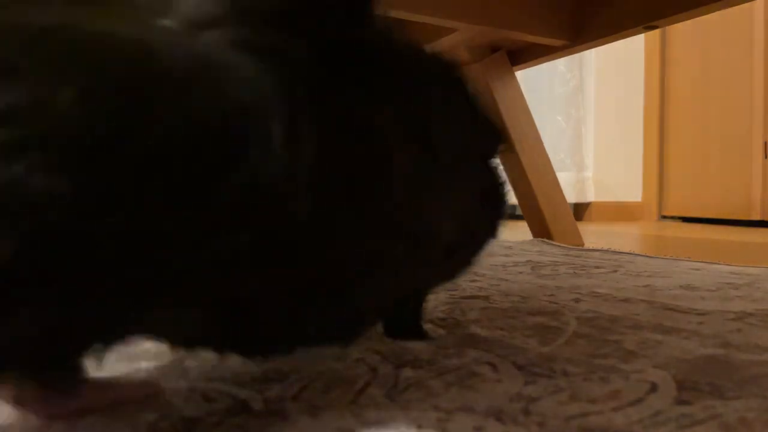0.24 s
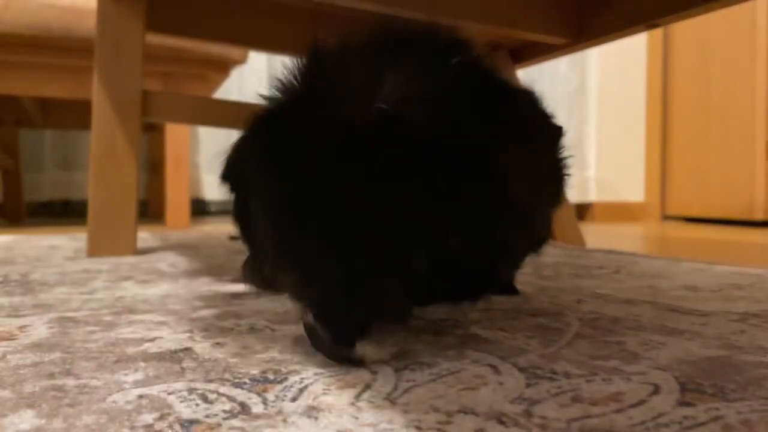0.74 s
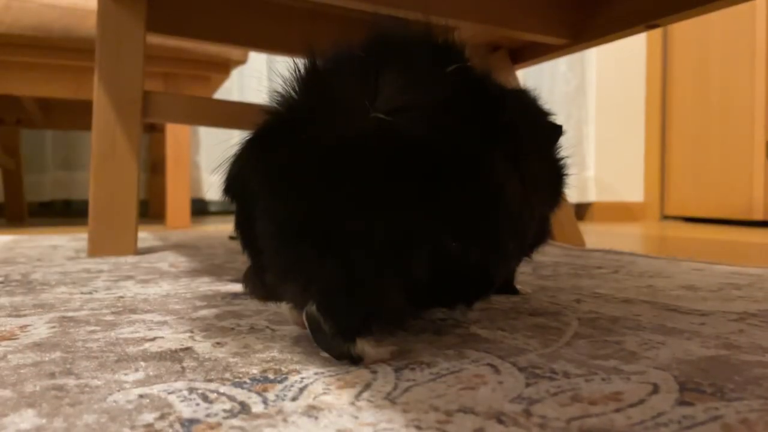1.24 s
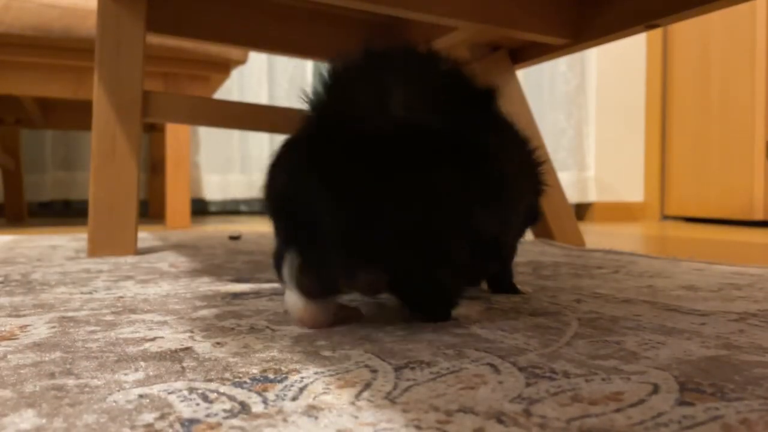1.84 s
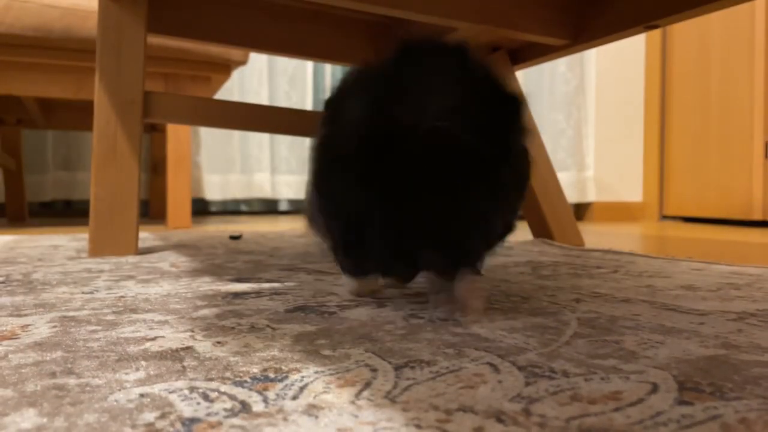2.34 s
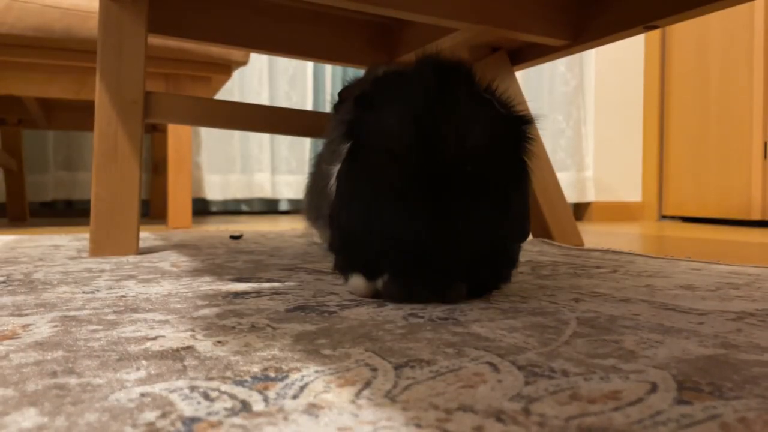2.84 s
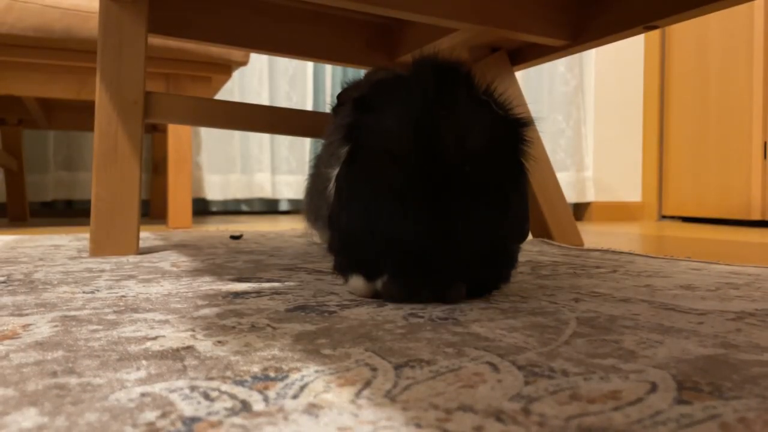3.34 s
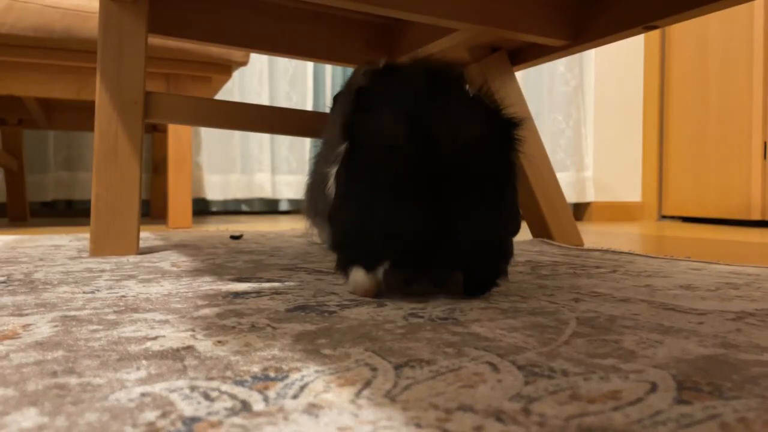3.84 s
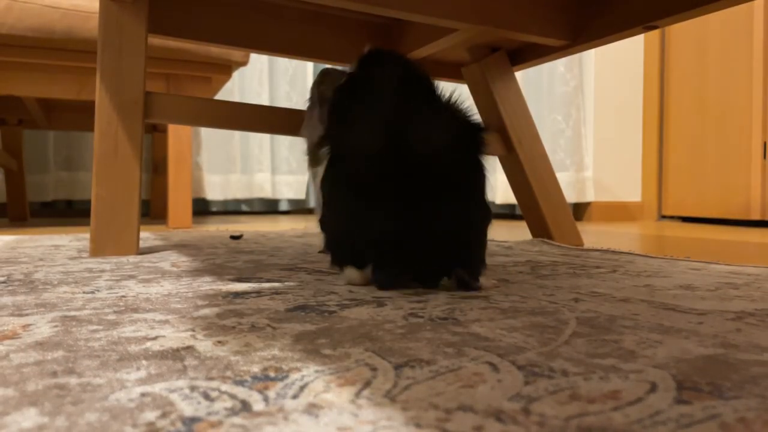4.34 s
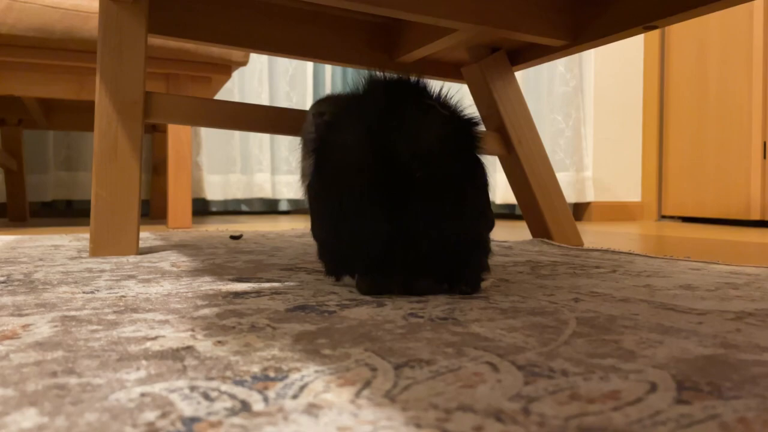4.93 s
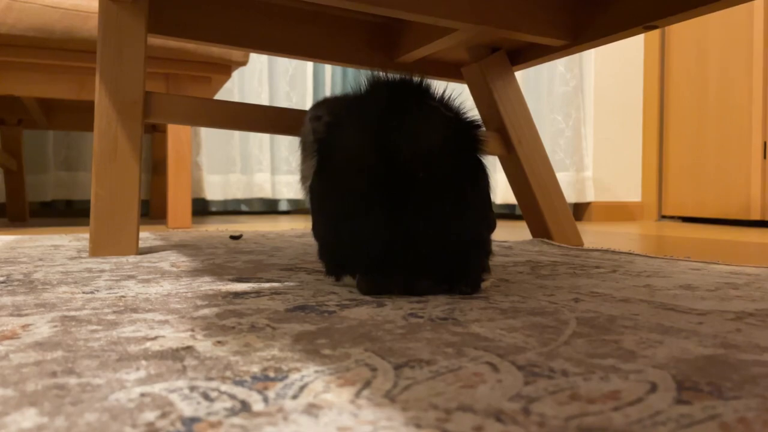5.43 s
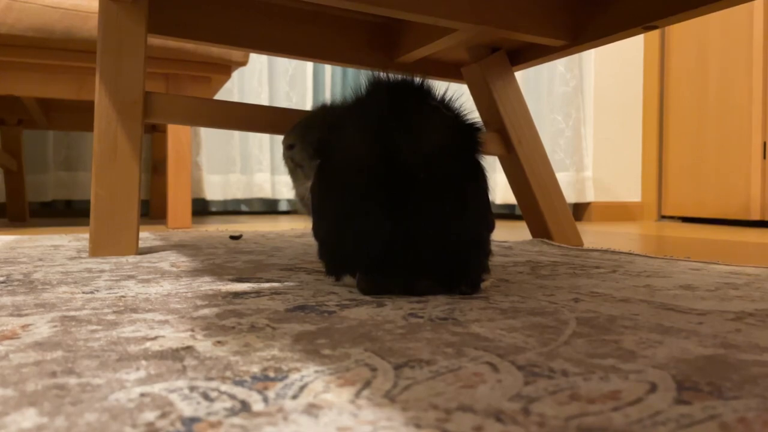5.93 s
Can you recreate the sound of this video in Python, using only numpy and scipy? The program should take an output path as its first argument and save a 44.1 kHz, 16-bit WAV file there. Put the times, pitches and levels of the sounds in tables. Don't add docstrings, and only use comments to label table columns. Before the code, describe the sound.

A guinea pig close by chutters in soft creaky chirps and rattling purrs, with faint rug scuffs and a few low floor thumps indoors.

```python
import sys
import numpy as np
from scipy import signal
from scipy.fft import rfft, irfft
from scipy.io import wavfile
from scipy.ndimage import uniform_filter1d

SR = 44100
rng = np.random.default_rng(int(sys.argv[2]) if len(sys.argv) > 2 else 0)


def generate_wav(sig):
    pcm = np.round(np.clip(np.atleast_2d(sig).T, -1, 1) * 32767).astype(np.int16)
    wavfile.write(sys.argv[1], SR, pcm)


def amplitude_ratio(level_db):
    exponent = np.asarray(level_db, float) / 20
    return 10 ** exponent


N = 272582

TURNS_S = [
    2.1,
    4.4,
]
# frequency in Hz, depth as a share.
FLUTTERS = [
    (860, .24),
    (900, .12),
    (1000, .12),
]


def evened(x):
    return x / np.sqrt(np.mean(x ** 2) + 1e-20)


def read(points, hz, axis=1):
    table = np.array(points, float)
    return np.interp(np.log(hz + 1), np.log(table[:, 0] + 1), table[:, axis])


def add(mix, s, sound):
    part = mix[..., max(round(s * SR), 0):][..., :sound.shape[-1]]
    part += sound[..., :part.shape[-1]]


def ring(x, hz, width):
    pole = np.exp((2j * np.pi * hz - np.pi * width) / SR)
    return 2 * signal.lfilter([1 - abs(pole)], [1, -pole], x).real


def ring_twice(x, hz, width):
    return ring(ring(x, hz, width), hz, width)


def posture_at(s):
    return np.searchsorted(TURNS_S, s)


def noise(shape, patchy_db, swell_db):
    frames, hz = N // 512 + 5, np.fft.rfftfreq(2048, 1 / SR)
    a, b, patches = rng.standard_normal((frames, 1025, 3)).T
    patches = uniform_filter1d(patches, size=16, axis=0)
    patches = evened(uniform_filter1d(patches, size=6, axis=1))
    swell = evened(uniform_filter1d(rng.standard_normal(frames), size=15))
    gain_db = read(shape, hz)[:, None] + patchy_db * patches + swell_db * swell
    spectra = (a + 1j * b) * amplitude_ratio(gain_db)
    return evened(signal.istft(spectra, nperseg=2048, noverlap=1536)[1][:N])


def room_tone():
    # frequency in Hz, level in dB per Hz.
    hum_shape = [(15, -49.5), (25, -18), (76, -8), (170, 0), (284, -9.5), (462, -10.5), (711, -18),
                 (814, -25), (932, -19), (1190, -34), (1520, -39), (1880, -45), (5110, -49), (12800, -59),
                 (14200, -79.5)]
    # frequency in Hz, level in dB per Hz.
    air_shape = [(15, -48), (25, -22), (70, -4), (316, -4), (393, 0), (605, -7), (883, -6.5), (1290, -21),
                 (1560, -34.5), (1730, -36), (4970, -43.5), (9250, -47.5), (15900, -75.5)]
    common = amplitude_ratio(-52) * noise(hum_shape, 1.6, .4)
    opposite = amplitude_ratio(-54) * noise(air_shape, 1.8, .4)
    return np.array([common + opposite, common - opposite])


def machinery():
    # frequency in Hz, width in Hz, level in dB.
    drone_bands = [(69.7, 36, -56), (146.2, 11, -58.5)]
    return sum(amplitude_ratio(db) * evened(ring_twice(rng.standard_normal(N), hz, width))
               for hz, width, db in drone_bands)


def throat(x, s):
    # frequency in Hz, width in Hz, level in dB.
    resonances = [
        [(239, 104, 10), (553, 217, -1.5), (795, 284, -4.5), (1111, 405, -4.5), (1864, 1020, -26),
         (3240, 560, -45)],
        [(225, 53.5, 10.5), (377, 205, 0.5), (650, 298, 1.5), (1117, 350, 0.5), (2240, 1660, -21.5),
         (3350, 880, -25.5)],
        [(225, 180, 6), (398, 455, -3), (775, 433, 2.5), (1131, 248, 4), (2440, 2140, -30.5),
         (3190, 560, -25.5)],
    ]
    # time in seconds, lift in dB.
    mouth_opening = [(0.0, -2), (2.1, -1), (2.15, -6), (2.28, 7.5), (2.41, -3), (2.9, -1.5), (3.3, 3.5),
                     (3.6, -1.5), (3.9, 4), (4.3, -2), (4.6, -2), (4.9, 0), (5.3, 5), (5.5, 9.5)]
    nose_notch = [
        2850,
        1770,
        1480,
    ]
    posture = posture_at(s)
    open_db = np.interp(s, *np.transpose(mouth_opening))
    tube = 0
    for k, (hz, width, db) in enumerate(resonances[posture]):
        gain = (-1) ** k * amplitude_ratio(db + open_db * (hz > 2000))
        tube = tube + gain * ring_twice(x, hz, width)
    nosed = signal.lfilter(*signal.iirnotch(nose_notch[posture], 2.2, SR), tube)
    return 0.82 * tube + 0.25 * nosed


def note(s, length, start_hz, middle_hz, end_hz, db):
    slope, shimmer, jitter, air = .8, .25, .035, .3
    wobble = rng.standard_normal((2, 4000))
    u = np.linspace(0, 1, round(length * SR))
    hz = np.polyval(np.polyfit([0, .5, 1], [start_hz, middle_hz, end_hz], 2), u)
    pitch_shake, size_shake = [evened(uniform_filter1d(w, size=70))[:len(u)] for w in wobble]
    turns = np.cumsum(hz * (1 + jitter * (450 / hz) ** 1.4 * pitch_shake)) / SR
    folds = sum(np.cos(2 * np.pi * k * turns) / k ** (slope * (hz / 500) ** 1.1) for k in range(1, 15))
    hiss = wobble[1, ::-1][:len(u)]
    folds = folds + air * 450 / hz * (1 + np.cos(2 * np.pi * turns)) * hiss
    folds = folds * (1 + shimmer * size_shake) * signal.windows.tukey(len(u), .5)
    sound = evened(throat(np.pad(folds, (0, 400)), s))
    return amplitude_ratio(db) * sound * np.minimum(1, np.arange(len(u) + 400)[::-1] / 250)


def swelling(s, length, top, db, rate):
    slack_rate = .7 * rate
    return [(s, db - 18.5, slack_rate), (s + top * length, db, rate), (s + length, db - 23.5, slack_rate)]


def holding(s, length, db, rate):
    edge, end_rate = .2 * length, .85 * rate
    return [(s, db - 3.5, rate), (s + edge, db, rate),
            (s + length - edge, db, end_rate), (s + length, db - 4.5, end_rate)]


def creak(rows):
    # time in seconds, share of air.
    breathiness = [(0, .65), (2.1, 1.1), (2.15, 0.97), (2.3, 3.1), (2.8, 1.3), (3.2, 1.6), (3.35, .8),
                   (3.8, 1.2), (4.2, 0.77), (5.5, 1.8)]
    s, effort_db, rate = np.transpose(rows)
    start, shiver_s, shiver_rise_s = s[0], .003, .00081
    chance = rng.standard_normal((80, 3))
    t = np.arange(start, s[-1] + 0.024, 1 / SR)
    pulse_rate = np.interp(t, s, rate)
    cycles = np.cumsum(pulse_rate * (t < s[-1])) / SR
    gaps = np.exp(.22 * chance[:, 0])
    sizes = amplitude_ratio(2 * chance[:, 1])
    at = np.searchsorted(cycles, np.cumsum(gaps) - .9)
    slaps, after = np.zeros(len(t) + 400), np.arange(400) / SR
    fade = np.exp(-after / shiver_s) * (1 - np.exp(-after / shiver_rise_s))
    flutter_hz, depth = FLUTTERS[posture_at(start)]
    for place, size, detune in zip(at[at < len(t)], sizes, chance[:, 2]):
        hz = flutter_hz * (1 + .08 * detune)
        slaps[place:place + 400] += size * depth * np.sin(2 * np.pi * hz * after) * fade
        slaps[place:place + 14] += size / 3 * np.hanning(16)[1:-1]
    breath = uniform_filter1d(abs(slaps), size=250) * rng.standard_normal(SR)[:len(slaps)]
    share = np.interp(start, *np.transpose(breathiness))
    drive = (evened(slaps) + share * evened(breath))[:len(t)] / np.sqrt(pulse_rate)
    end_fade = np.minimum(1, (t[-1] - t) / .01)
    return start, amplitude_ratio(np.interp(t, s, effort_db)) * evened(throat(drive, start)) * end_fade


def voice():
    # start in seconds, length in seconds, middle pitch in Hz, bend as share of pitch, level in dB.
    arch_notes = [(0.059, 0.014, 377, 0.044, -49), (0.314, 0.015, 456, 0.42, -41),
                  (0.339, 0.013, 622, 0.12, -36), (.355, 0.015, 705, 0.11, -44),
                  (0.501, .018, 608, .1, -55.5), (0.747, 0.024, 954, 0.19, -45),
                  (1.144, 0.017, 825, 0.083, -44), (1.235, 0.019, 767, 0.13, -48),
                  (1.463, 0.0092, 857, 0.082, -46), (1.522, 0.012, 529, 0.31, -44.5),
                  (1.662, 0.041, 985, 0.36, -40.5), (2.03, 0.0091, 858, .115, -47),
                  (2.344, 0.014, 537, 0.088, -46.5), (2.361, 0.017, 650, 0.29, -40.5),
                  (2.853, 0.021, 601, 0.11, -50.5), (2.888, .048, 809, 0.37, -41.5),
                  (3.394, 0.019, 313.4, 0.1, -44.5), (3.873, 0.019, 745, 0.26, -36.5),
                  (3.926, .042, 415, 0.063, -41), (4.587, 0.039, 406, 0.077, -48.5),
                  (5.026, 0.016, 341.4, 0.05, -47)]
    sag_notes = [(0.087, 0.0065, 716, .03, -52), (0.451, 0.027, 705, 0.18, -44.5),
                 (0.565, 0.012, 565, 0.03, -40.5), (1.603, 0.023, 748, 0.044, -53.5),
                 (2.416, .012, 625, 0.061, -51), (3.406, 0.0243, 641, .03, -41.5),
                 (3.618, 0.034, 255.3, 0.25, -46.5), (4.235, 0.023, 259.7, 0.19, -45),
                 (4.249, .02, 633, 0.01, -42), (4.267, .025, 621, .01, -56),
                 (4.539, 0.029, 290.4, 0.073, -44), (4.937, 0.0406, 271.3, 0.12, -44),
                 (5.268, 0.0081, 283, 0.012, -47), (5.36, 0.0184, 294.5, 0.11, -46),
                 (5.62, 0.0284, 243.7, 0.29, -44)]
    rise_notes = [(0.0, 0.0073, 630, .05, -44), (0.109, 0.015, 795, 0.052, -43),
                  (0.176, 0.024, 725, 0.11, -45.5), (0.38, 0.014, 884, 0.29, -43.5),
                  (0.537, 0.0245, 396, .2, -45.5), (0.651, .025, 905, 0.14, -44.5),
                  (3.846, 0.032, 397, 0.27, -42.5), (3.907, .024, 339, .25, -40),
                  (2.985, 0.01, 700, .1, -42.5)]
    fall_notes = [(0.147, 0.0096, 435, 0.23, -40.5), (0.163, 0.018, 591, 0.11, -38),
                  (0.424, 0.011, 818, 0.063, -47.5), (0.61, 0.029, 744, 0.26, -45.5),
                  (0.675, 0.023, 771, 0.25, -44.5), (0.705, 0.025, 640, 0.043, -47),
                  (0.951, 0.022, 759, 0.19, -47), (1.05, 0.019, 754, .06, -46),
                  (1.513, 0.014, 359, 0.33, -47), (2.994, .027, 699.5, 0.14, -39.5),
                  (5.541, .03, 249.5, .1, -44), (3.046, 0.019, 567, 0.055, -46),
                  (3.296, 0.053, 644, 0.31, -40.5), (3.89, 0.011, 338, 0.46, -39.5),
                  (4.846, 0.046, 498, 0.41, -44), (5.28, 0.02, 572, 0.17, -43),
                  (5.507, 0.037, 310.6, 0.47, -43), (5.579, 0.025, 402, 0.18, -44)]
    contours = [
        (-1, -1),
        (1, 1),
        (-1.2, .8),
        (1, -.25),
    ]
    # start in seconds, length in seconds, place of the top 0-1,
    # top effort in dB, top rate in pulses per second.
    swell_creaks = [(0.04, 0.22, 0.6, -47.5, 154), (0.311, 0.08, 0.66, -35.5, 185),
                    (0.417, 0.077, 0.12, -36, 165), (0.585, .2, 0.69, -35, 155),
                    (0.881, 0.12, 0.21, -45, 123), (1.507, 0.028, 0.13, -47, 190),
                    (1.584, 0.096, 0.33, -39.5, 108), (1.661, 0.2, 0.44, -47.5, 114),
                    (2.323, 0.07, 0.5, -35, 190), (2.869, 0.23, .55, -39.5, 155),
                    (4.003, 0.022, 0.91, -50, 159), (4.239, 0.035, 0.26, -32, 216),
                    (4.772, 0.0437, 0.7, -40, 170)]
    # start in seconds, length in seconds, effort in dB, pulses per second.
    hold_creaks = [(0.232, 0.0405, -62.5, 76), (.98, 0.23, -56, 170), (1.201, .25, -58, 162),
                   (3.798, 0.046, -45, 200), (2.149, 0.095, -49.5, 153), (2.244, 0.018, -50, 190),
                   (2.269, 0.0264, -45.5, 220), (2.303, 0.0157, -46.5, 237), (3.222, 0.081, -51.5, 136),
                   (3.33, 0.15, -51, 150), (3.468, 0.17, -60.5, 123), (4.861, .185, -54, 140),
                   (5.251, 0.036, -49, 175), (5.3, 0.082, -54, 139), (5.505, 0.14, -45.5, 175),
                   (3.845, 0.11, -46.5, 160)]
    clear, rough, busy = np.zeros((3, N))
    for notes, (first, last) in zip([arch_notes, sag_notes, rise_notes, fall_notes], contours):
        for s, length, hz, bend, db in notes:
            add(clear, s, note(s, length, hz * (1 + first * bend), hz, hz * (1 + last * bend), db))
            add(busy, s, np.ones(round(length * SR)))
    for rows in [swelling(*row) for row in swell_creaks] + [holding(*row) for row in hold_creaks]:
        add(rough, *creak(rows))
    return clear + rough * amplitude_ratio(-18 * uniform_filter1d(np.minimum(busy, 1), size=200))


def scuffs():
    # start in seconds, length in seconds, level in dB, brightness 0-1, left minus right in dB.
    brushes = [(0.0, 0.0058, -53, 0.62, 4.5), (0.015, 0.48, -81.5, 0.68, 7), (0.349, 0.036, -59, 0.6, 6),
               (0.435, 0.013, -70, 0.52, 13), (0.593, 0.007, -73, 0.53, 16), (0.61, 0.03, -61, 0.51, 6),
               (1.737, 0.041, -72, 0.65, 9), (2.194, 0.058, -61.5, 0.51, 2), (2.236, 0.045, -58, 0.61, 1),
               (2.279, 0.026, -64, 0.62, 3), (2.313, 0.0045, -42.5, 1.1, 1.5), (2.314, 0.018, -56, 0.9, 2),
               (2.324, 0.077, -65.5, 0.7, 3), (3.187, 0.19, -71.5, 0.71, 5.5), (3.003, 0.45, -86, 0.7, 8),
               (3.93, 0.044, -83, 1.0, -3), (6.154, 0.012, -71, 0.75, 6)]
    # frequency in Hz, level in dB per Hz.
    dull_shape = [(1060, -4), (1800, 1), (3290, -9), (3600, -7.5), (5400, -12), (5970, -19), (13200, -24.5),
                  (14600, -40.5)]
    # frequency in Hz, level in dB per Hz.
    crisp_shape = [(2060, -46), (3500, -29.5), (5050, -27.5), (5650, -23), (6100, -8.5), (9850, -4.5),
                   (11500, 6.5), (15800, -2)]
    out = np.zeros((2, N))
    for s, length, db, bright, pan_db in brushes:
        count = round(length * SR)
        hz, bright = np.fft.rfftfreq(count, 1 / SR), min(bright, 1)
        a, b, grain = rng.standard_normal((3, SR // 2))[:, :count]
        colour = amplitude_ratio((2.5 - bright) * read(dull_shape, hz) + bright * read(crisp_shape, hz))
        spread = 1.48 - bright
        hiss = evened(irfft(rfft([a + spread * b, a - spread * b]) * colour, count))
        graininess = amplitude_ratio(2.0 * evened(uniform_filter1d(grain, size=60)))
        shape = np.sin(np.pi * np.linspace(0, 1, count) ** .6) * graininess
        add(out, s, amplitude_ratio(db + np.array([[pan_db], [-pan_db]]) / 2) * hiss * shape)
    return out


def pips():
    # time in seconds, peak level in dB, pitch in Hz.
    purr_pips = [(0.987, -39, 754), (1.003, -50.5, 729), (1.036, -42.5, 733), (1.079, -43, 867),
                 (1.089, -46, 824), (1.107, -43.5, 950), (1.123, -41, 880), (1.133, -37.5, 814),
                 (1.169, -38, 794), (1.185, -43, 764), (1.205, -40, 810), (1.22, -42.5, 784),
                 (1.235, -40.5, 712), (1.27, -42, 780), (1.296, -40, 775), (1.308, -45, 775),
                 (1.325, -41, 760), (1.338, -52, 770), (1.366, -45.5, 775), (1.385, -39.5, 814),
                 (1.392, -43, 804), (1.41, -42, 818), (1.417, -42, 751), (1.441, -42, 775),
                 (1.852, -47.5, 708), (1.881, -43.5, 805), (1.917, -42, 777), (1.946, -45.5, 770),
                 (1.992, -46.5, 797)]
    rise_s, fall_s = 0.001135, 0.0017
    t, out = np.arange(900) / SR, np.zeros(N)
    shape = (1 - np.exp(-t / rise_s)) ** 2 * np.exp(-t / fall_s)
    shape = shape / shape.max()
    for s, db, hz in purr_pips:
        tone = np.sin(2 * np.pi * (hz * t + rng.random()))
        air = evened(ring(rng.standard_normal(900), 2 * hz, 600))
        add(out, s - rise_s, amplitude_ratio(db) * shape * (tone + amplitude_ratio(-25) * air))
    return signal.lfilter(*signal.butter(4, 1900, fs=SR), out)


def thumps():
    # time in seconds, blow in dB, pitch factor, extra dB of the modes under 100 Hz.
    blows = [
        (2.366, -37.5, 0.64, 11),
        (2.431, -25.5, 0.75, 8),
        (4.0151, -21.5, 0.9, 4),
    ]
    # frequency in Hz, level in dB, time to fall 60 dB in seconds.
    board_modes = [(68.5, -10, 0.76), (99.96, 14.5, 0.06), (147, 0.5, 0.49), (195.5, 4, 0.14)]
    t, out = np.arange(SR // 2) / SR, np.zeros(N)
    sagging = t + 0.25 * 0.0079 * (1 - np.exp(-t / 0.0069))
    for s, blow_db, pitch, low_db in blows:
        boards = sum(amplitude_ratio(db + low_db * (hz < 100) - 60 * t / t60) * np.sin(-2 * np.pi * hz * pitch * sagging)
                     for hz, db, t60 in board_modes)
        add(out, s, amplitude_ratio(blow_db - 9.0) * boards * (1 - np.exp(-t / 0.005)))
    return signal.lfilter(*signal.butter(2, 45, "high", fs=SR), out)


def sniffs_and_fur():
    # start in seconds, length in seconds, level in dB, extra dB of side bands,
    # of top bands.
    hiss_rows = [
        (3.017, .34, -89.5, -6, 10.5),
        (3.213, 0.094, -68.5, -2, -19),
        (5.701, .29, -87, -12, -27),
    ]
    # frequency in Hz, width in Hz, level in dB,
    # group (0 main, 1 side, 2 top).
    hiss_bands = [(4900, 700, 1.5, 0), (3840, 620, -2, 1), (6960, 750, -4, 1), (13500, 2000, 1.5, 2),
                  (15550, 400, -8, 2)]
    out = np.zeros((2, N))
    for s, length, db, side_db, top_db in hiss_rows:
        air = rng.standard_normal((2, SR // 2))[:, :round(length * SR)]
        air = air + 0.34 * air[::-1]
        group_db = [0, side_db, top_db]
        hiss = sum(amplitude_ratio(band_db + group_db[round(group)]) * evened(ring_twice(air, hz, width))
                   for hz, width, band_db, group in hiss_bands)
        add(out, s, amplitude_ratio(db) * hiss * np.sin(np.pi * np.linspace(0, 1, air.shape[1])) ** 0.61)
    return out


def knocks():
    # time in seconds, peak level in dB.
    lone_slaps = [(3.359, -37), (3.371, -40), (3.384, -37.5), (3.436, -38.5), (3.451, -36.5),
                  (3.463, -39.5), (3.481, -42), (3.5, -47.5), (3.516, -49), (3.528, -42), (3.55, -44.5),
                  (3.57, -46), (3.588, -44.5), (3.603, -46.5), (3.617, -38.5), (4.198, -44), (4.218, -37.5),
                  (4.502, -42), (4.514, -40), (4.82, -43), (4.898, -37), (4.912, -40.5), (4.926, -39.5),
                  (4.98, -43), (4.993, -39.5), (5.007, -38), (5.018, -38.5), (5.204, -44), (5.218, -42.5),
                  (5.309, -38.5), (5.321, -42), (5.334, -43), (5.348, -37)]
    t, out = np.arange(700) / SR, np.zeros(N)
    for s, db in lone_slaps:
        hz = FLUTTERS[posture_at(s)][0] * rng.uniform(.9, 1.1)
        shiver_and_puff = .3 * np.sin(2 * np.pi * hz * t) + .25 * rng.standard_normal(700)
        slap = np.pad(np.hanning(14), (0, 686))
        sound = throat(shiver_and_puff * np.exp(-t / .002) + slap, s) * np.hanning(1400)[700:]
        add(out, s - .001, amplitude_ratio(db) * sound / abs(sound).max())
    return out


def claw_tap():
    # time in seconds, frequency in Hz, width in Hz, level in dB.
    wood_tap = (6.156, 2100, 160, -66)
    out = np.zeros((2, N))
    s, hz, width, db = wood_tap
    blow = np.pad(np.ones(3), (0, 600))
    add(out, s, amplitude_ratio(db) * evened(ring_twice(blow, hz, width))[None])
    return out


def ports(x):
    # frequency in Hz, right port's lead in radians, left minus right in dB.
    port_paths = [
        [(258, -0.0, 1), (430, -1.4, 2), (602, -1.8, 0), (775, 0.7, -5), (947, -0.3, -1), (1205, 0.2, 0),
         (1636, -0.1, 2), (2325, -0.6, 0), (3100, -1.8, 4)],
        [(258, 0.1, 0), (430, -0.2, 0), (602, -0.3, 2), (775, -1.2, 2), (947, 0.4, 4), (1205, -0.6, 3),
         (1636, 1.3, 2), (2325, 4.3, -2), (3100, 3.7, 14)],
        [(258, -0.0, 1), (430, -0.4, 0), (602, -2.0, 4), (775, -0.5, 4), (947, -0.3, 6), (1205, 0.7, -1),
         (1636, 1.8, 2), (2325, 4.9, 3), (3100, 2.7, 9)],
    ]
    hz, out = np.fft.rfftfreq(N, 1 / SR), np.zeros((2, N))
    posture = posture_at(np.arange(N) / SR)
    for k, path in enumerate(port_paths):
        half = amplitude_ratio(read(path, hz, axis=2) / 2) * np.exp(-1j * read(path, hz) / 2)
        out += irfft(rfft(x * (posture == k)) * np.array([half, 1 / half]), N)
    return out


def reflections(x):
    t60, wet_db, top_hz = 0.15, -17, 1500
    taps = np.zeros((2, SR // 2))
    at = np.arange(200, SR // 2 - 20, 20) + rng.integers(0, 20, (2, (SR // 2 - 201) // 20))
    np.put_along_axis(taps, at, rng.choice([-1., 1.], at.shape), 1)
    decay = amplitude_ratio(-60 * np.arange(SR // 2) / SR / t60)
    tail = signal.lfilter(*signal.butter(1, top_hz, fs=SR), taps * decay)
    return amplitude_ratio(wet_db) * signal.fftconvolve(x[None], tail / np.linalg.norm(tail[0]), axes=1)[:, :N]


def scene():
    pig = voice() + pips() + knocks()
    animal = ports(pig) + reflections(pig) + sniffs_and_fur()
    contact = scuffs() + thumps() + claw_tap()
    return animal + contact + machinery() + room_tone()


def roll_off(x):
    return signal.sosfilt(signal.butter(12, 16030, fs=SR, output="sos"), x)


def record(dry):
    mix = signal.lfilter(*signal.butter(3, 42, "high", fs=SR), dry)
    return roll_off(mix)


dry = scene()
out = record(dry)
generate_wav(out)
```